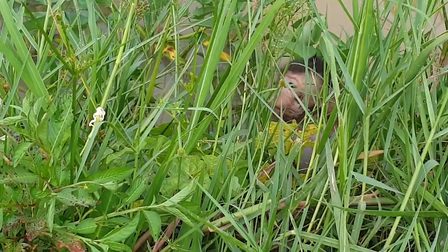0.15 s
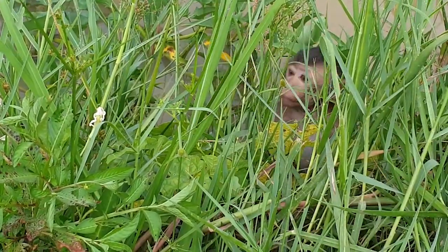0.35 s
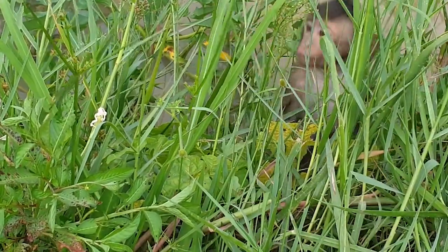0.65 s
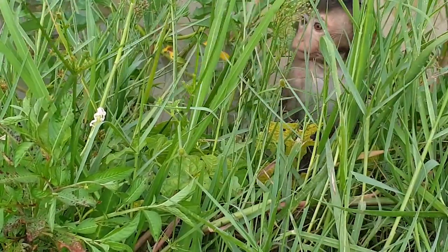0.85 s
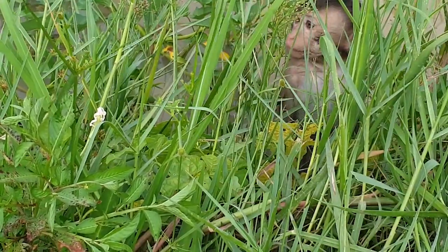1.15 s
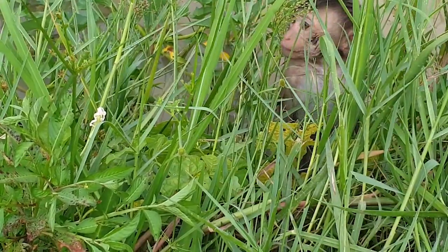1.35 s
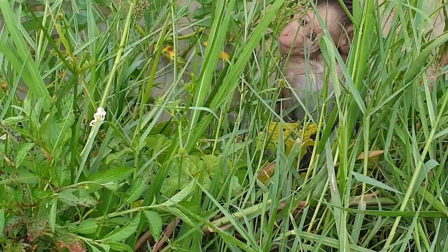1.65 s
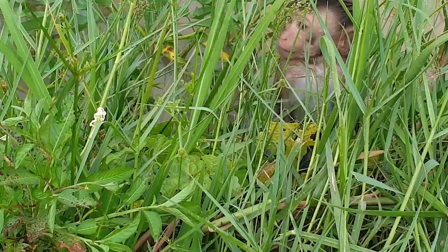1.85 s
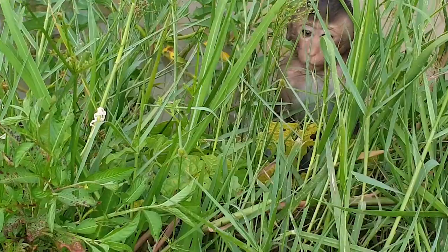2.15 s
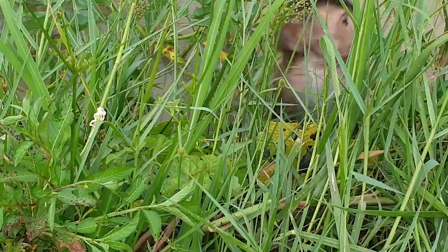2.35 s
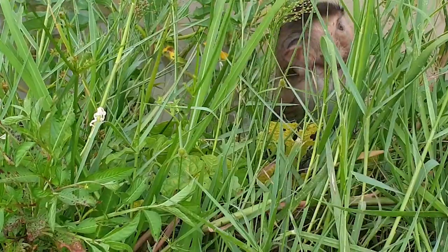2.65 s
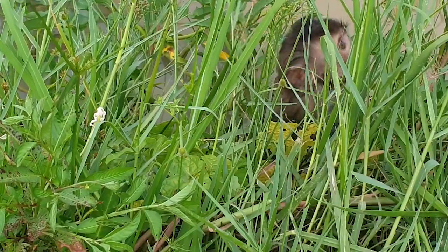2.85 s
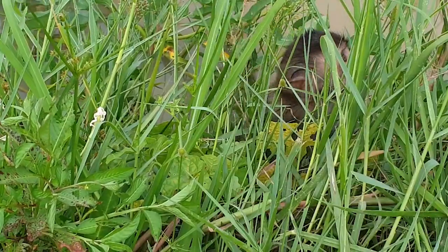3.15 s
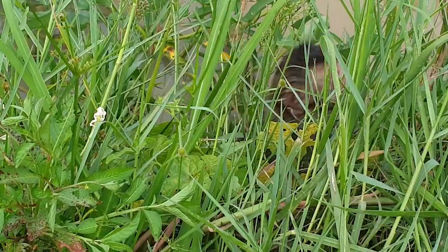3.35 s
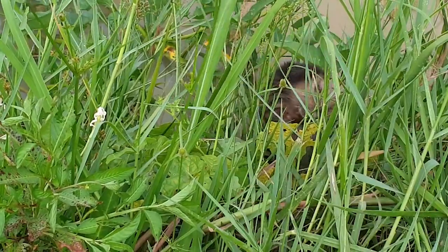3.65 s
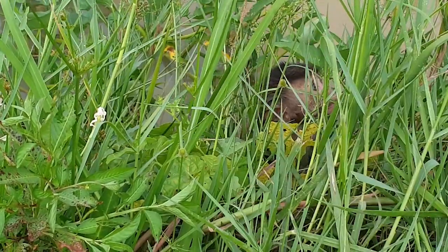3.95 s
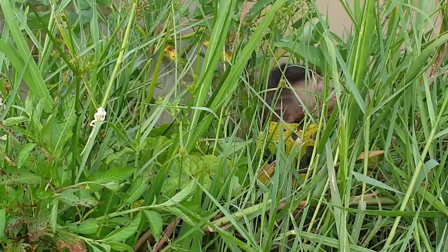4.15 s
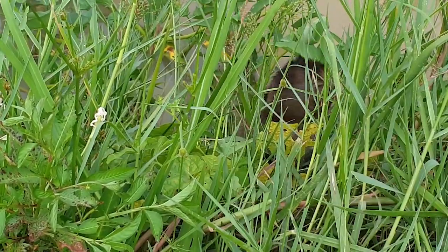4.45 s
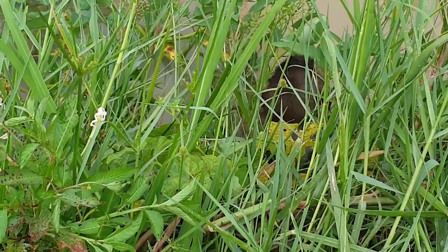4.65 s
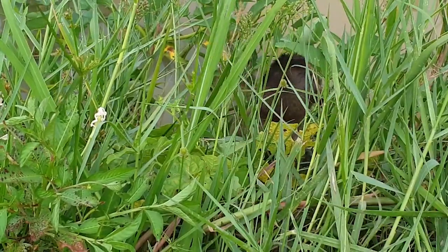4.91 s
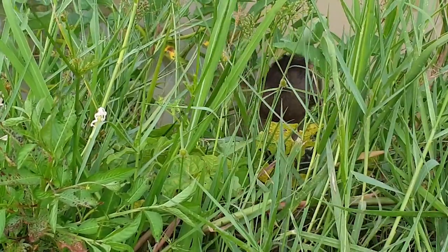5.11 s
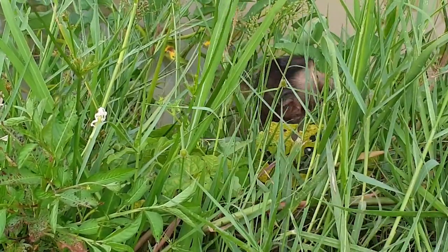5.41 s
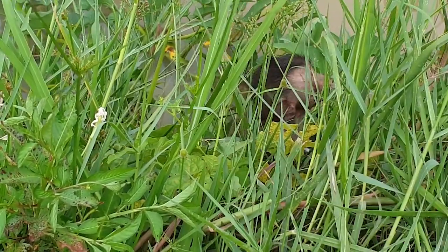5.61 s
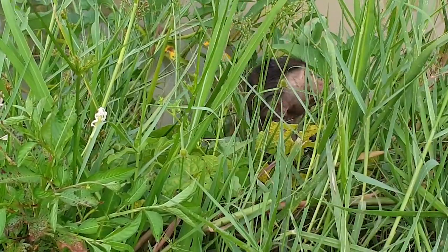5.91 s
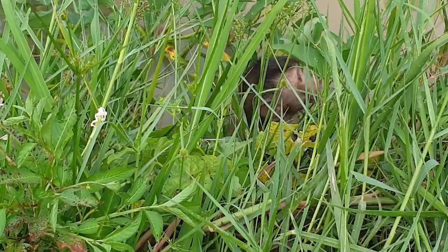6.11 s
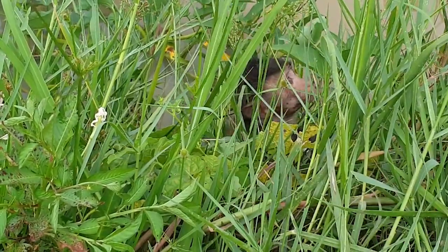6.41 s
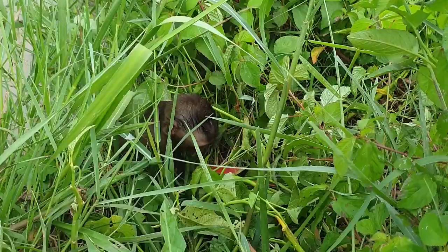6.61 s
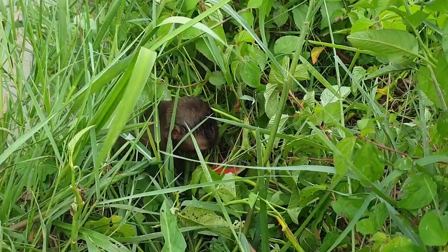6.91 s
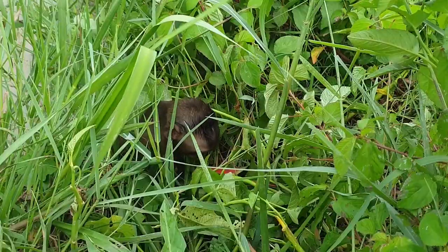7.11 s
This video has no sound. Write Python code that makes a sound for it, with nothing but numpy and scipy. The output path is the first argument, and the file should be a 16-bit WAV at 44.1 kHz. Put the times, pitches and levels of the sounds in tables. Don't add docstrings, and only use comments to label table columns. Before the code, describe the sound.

Birds whistle and twitter over rustling grass, a young monkey gives one high clear coo, then a low motor rumble abruptly takes over.

```python
import sys
import numpy as np
from scipy import signal
from scipy.fft import rfft, irfft, next_fast_len
from scipy.io import wavfile
from scipy.ndimage import map_coordinates

SR = 44100
rng = np.random.default_rng(int(sys.argv[2]) if len(sys.argv) > 2 else 0)


def generate_wav(sig):
    pcm = np.round(np.clip(np.atleast_2d(sig).T, -1, 1) * 32767).astype(np.int16)
    wavfile.write(sys.argv[1], SR, pcm)


def nominal_scale(level):
    x = np.asarray(level, float) / 20
    return 10 ** x


N = 320607
TIME, SIZE = np.arange(N) / SR, next_fast_len(N)
HZ = np.maximum(np.arange(SIZE // 2 + 1) * SR / SIZE, 1)
SCENE_CHANGE_S = 6.495

# pitch_hz, level_db (per Hz)
AIR_SPECTRUM = [(170, -14), (350, 9), (600, -3.5), (1500, -6), (2400, -5), (3400, -3), (4700, -6),
                (6800, -2.5), (7600, -5), (8600, -20), (10500, -7.5), (11500, -3.5), (12600, -14),
                (16000, -25)]
# start_s, level_db
TREE_BREEZE = [(0, -3), (.25, -5), (.4, -5), (.6, 2.5), (.8, -7), (1.12, -13), (1.25, -2), (1.4, -3),
               (1.6, -2), (2.75, -3), (3.3, -2), (4.4, 2), (5.1, 3), (5.6, 3), (5.85, -7), (6.2, 1.5),
               (6.35, -4), (6.5, 2)]
# start_s, peak_db, spread_s
GRASS_BRUSHES = [(0, -55, 0.023), (.22, -54, 0.17), (.74, -43.5, 0.072), (1.0, -48.5, 0.2),
                 (1.63, -48, 0.1), (2.0, -53.5, 0.046), (2.28, -48, 0.088), (2.51, -46, 0.14),
                 (2.96, -49, 0.13), (3.15, -55.5, 0.079), (3.4, -57, 0.17), (4.3, -75, .08),
                 (4.72, -60.5, 0.35), (5.34, -44, 0.083), (5.65, -55, 0.058), (5.92, -55, 0.075),
                 (6.19, -56, 0.019), (6.42, -80, 0.19), (2.2, -53.5, 0.56), (5.6, -55.5, 0.87)]
# pitch_hz, level_db (per Hz)
RUSTLE_SPECTRUM = [(530, -44), (900, -10.5), (1250, -8.5), (1470, -7.5), (1590, -10), (4100, -3),
                   (8760, -6.5), (12900, -2), (15200, -4.5), (16000, 0.5)]

# start_s, level_db
BREEZE = [(0, -50), (.5, -43), (1.0, -44.5), (1.62, -45), (2.0, -42), (2.25, -45.5), (2.62, -38.5),
          (2.75, -43.5), (2.95, -40.5), (3.25, -44), (3.4, -39), (4.25, -42.5), (4.42, -45.5), (4.5, -31.5),
          (4.62, -38.5), (5.65, -42), (5.9, -37.5), (6.4, -41)]
# pitch_hz, level_db (per Hz)
WIND_COVERED = [(18, -32), (35, -5), (60, 0.5), (100, -1), (160, -10.5), (270, -19), (450, -36.5),
                (700, -53.5)]
WIND_OPEN = [(18, -8), (40, -21), (90, -1), (140, -9.5), (220, -10), (450, -21.5), (900, -23.5)]
# start_s, peak_db, pitch_hz, length_s
WIND_BUFFETS = [(1.168, -36.5, 68, 0.032), (1.904, -30, 89, 0.024), (1.923, -36.5, 55, 0.044),
                (2.024, -43, 111, 0.036), (2.537, -33, 75, 0.045), (4.426, -36.5, 120, 0.0079),
                (4.442, -28.5, 108, 0.013), (4.453, -27.5, 137, 0.017), (4.502, -32.5, 66, 0.031),
                (4.527, -35, 199, 0.014), (4.534, -33, 72, 0.025), (4.549, -27, 87.5, 0.022),
                (4.697, -41, 72.7, 0.055), (0.131, -50, 59, 0.044), (0.296, -51, 70, 0.047),
                (1.564, -41.5, 75, 0.052), (2.096, -41.5, 59, 0.044), (2.624, -42, 128, 0.028),
                (3.341, -40, 67, 0.048), (3.712, -41, 65, 0.043), (3.821, -39, 81, 0.038),
                (3.955, -39, 70, 0.048), (4.049, -44, 75, 0.043), (5.34, -38.5, 67, 0.033),
                (5.901, -43, 62, 0.038), (5.986, -40, 69.4, 0.038), (6.169, -44, 57, .04)]
# start_s, peak_db, spread_s
OPEN_GUSTS = [(.62, -58, 0.12), (1.2, -62.5, 0.16), (1.62, -58, 0.066), (2.22, -60.5, 0.26),
              (2.68, -60.5, 0.24), (3.2, -66.5, 0.19), (3.56, -53.5, 0.065), (4.0, -56, 0.24),
              (4.62, -52, 0.094), (4.9, -52, 0.097), (5.35, -51, 0.4), (5.75, -62, 0.035),
              (6.22, -58, 0.13), (6.49, -53, 0.046)]
# pitch_hz, level_db
COVER_RESPONSE = [(100, 2), (600, -6.5), (1100, -11.5), (2200, -7), (3000, -13), (4500, -25), (7700, -37),
                  (9000, -25), (16000, -53)]
# pitch_hz, level_db (per Hz)
COVERED_HISS = [(400, -4), (800, 5), (1200, 7), (2200, -2.5), (3200, -5), (4500, -13), (6000, -21),
                (7700, -48), (9000, -22.5), (11000, -8.5), (14000, -12), (16000, -9)]

# start_s, level_db
MOTOR_LOAD = [
    (6.502, -28.5),
    (6.7, -31),
    (6.77, -28.5),
    (6.85, -30),
    (7.12, -27),
    (7.27, -30),
]
# pitch_hz, level_db (per Hz)
MOTOR_RUMBLE = [(12, -58.5), (20, -25), (54, -13), (76, -1), (146, -3), (202, -3.5), (272, -17.5),
                (298, -9.5), (327, -26), (496, -20.5), (557, -30.5), (884, -33.5), (1040, -42.5),
                (1730, -54), (5000, -52), (6500, -56), (11000, -120)]
# multiple of the firing rate, level_db
FIRING_ORDERS = [(2, -41), (3, -7), (4, -8.5), (5, -14.5), (6, -28), (7, -15.5), (8, -18), (10, -27)]
# start_s, pitch_hz, level_db, spread_s
LOOSE_PANELS = [(6.52, 86, -1, .025), (6.57, 122, -1, .03), (6.61, 90, -2, .025), (6.77, 86, 1.5, .05),
                (6.71, 172, -3, .035), (7.0, 146, -1.5, .025), (7.11, 150, 2.5, .04), (7.18, 195, 1, .025),
                (7.22, 100, 0, .035)]
# pitch_hz, level_db
MOTOR_UNSHARED = [(30, -2), (90, -32), (160, -17), (400, -9.5), (800, -8.5), (1500, 3.5), (3500, 0.5)]

# start_s, length_s, pitch_hz,
# width_hz, level_db
FAR_CHORUS = [(2.95, .85, 1960, 170, -73), (3.2, .36, 3950, 300, -67), (1.52, 2.6, 2920, 930, -66),
              (-2, 6.3, 790, 41, -78.5), (3.6, .5, 3100, 700, -63), (.68, .12, 3600, 2000, -60),
              (1.1, 0.08, 450, 130, -57), (1.18, .25, 450, 170, -62), (4.22, .22, 3580, 300, -64),
              (6.18, .06, 3200, 1800, -59), (0.85, 0.4, 3500, 800, -66), (-0.5, 0.79, 800, 210, -70),
              (.8, .42, 3950, 500, -66), (3.5, .56, 5850, 300, -74), (3.55, .5, 3850, 500, -67),
              (5.75, .08, 1050, 300, -62), (5.8, .28, 1150, 450, -67), (5.9, .11, 3250, 900, -63),
              (6.28, .2, 3250, 250, -69), (.1, .25, 1380, 200, -71), (.66, .4, 1430, 150, -71),
              (2.68, .22, 3950, 300, -66)]
# start_s, length_s, pitch_hz, level_db
DOVE_NOTES = [
    (.24, 0.13, 848, -60.5),
    (.44, 0.065, 850, -64),
    (.56, 0.12, 880.4, -54),
    (1.02, 0.057, 858, -62.5),
    (4.65, 0.074, 800, -65),
    (5.0, 0.14, 825, -58),
]
# start_s, length_s, pitch_hz, level_db
LOW_NOTES = [(2.08, 0.033, 1920, -69), (4.01, 0.05, 1900, -65), (3.83, .03, 1920, -71),
             (2.83, .035, 1900, -65), (4.28, .02, 1900, -69), (4.61, .028, 1920, -67),
             (6.18, .035, 1930, -67), (.97, 0.071, 1950, -70), (5.085, .03, 1920, -66)]
FAR_NOTES = [(.88, 0.015, 3190, -66), (1.1, .04, 3900, -67), (1.51, .02, 3720, -59),
             (2.07, 0.039, 3760, -59), (3.3, 0.075, 3850, -64), (3.41, .096, 3830, -69),
             (3.66, .06, 3930, -65), (3.9, .02, 4000, -66), (4.215, .015, 3550, -67),
             (4.245, 0.015, 3550, -62), (4.61, .03, 3800, -68), (4.71, .04, 3050, -65)]
HIGH_NOTES = [(3.3, 0.058, 5680, -58.5), (3.375, .05, 5620, -60), (3.472, 0.05, 5600, -57.5),
              (3.53, .05, 5700, -63), (3.63, 0.073, 5800, -73), (3.72, .04, 5800, -71),
              (3.885, 0.05, 5600, -70), (3.99, .045, 5620, -70), (3.57, .04, 5850, -69),
              (3.79, 0.056, 5650, -75)]
# start_s, length_s, end_hz, fall_hz, level_db
SLIDES = [(1.833, 0.013, 2780, 100, -56), (1.885, 0.0093, 3190, 50, -54), (1.919, .012, 3100, 150, -56),
          (1.935, .012, 3350, -100, -58), (2.29, 0.017, 3170, 380, -52), (3.65, .012, 3150, -50, -54),
          (3.675, .025, 3100, 100, -53), (3.708, .008, 2900, 200, -51), (3.727, 0.02, 2780, 150, -50),
          (3.925, .02, 3340, 300, -57), (4.205, 0.01, 3150, -50, -58), (4.01, .012, 3050, 100, -58),
          (4.058, .006, 2800, 200, -46), (4.078, .01, 2750, 150, -56), (1.225, .03, 2990, 350, -63),
          (4.29, .1, 2620, 100, -66), (2.728, .045, 3080, 250, -58), (1.1, .03, 3900, 600, -63),
          (3.77, .03, 2800, 200, -59), (4.04, .015, 3500, 100, -60), (3.04, .012, 3000, 100, -58),
          (3.19, .02, 3200, -50, -59)]
# start_s, level_db
SOFT_PEEPS = [(2.56, -55), (2.725, -54.5), (2.885, -59), (3.035, -57), (3.204, -57.5), (3.368, -48),
              (3.538, -47), (3.78, -61.5), (3.879, -52)]
SHARP_CHIPS = [(2.621, -49), (2.774, -46), (2.941, -44.5), (3.103, -42.5), (3.27, -43), (3.441, -44),
               (3.61, -48), (3.95, -46.5)]
# start_s, length_s, end_hz, fall_hz, level_db
NEAR_PHRASE = [(1.29, 0.022, 2383, 0, -57), (1.544, 0.098, 2490, 1300, -51.5),
               (1.644, 0.03, 2740, 602, -55), (1.705, 0.044, 2435, 150, -54),
               (1.735, 0.018, 2305, 100, -54.5), (1.777, 0.11, 2450, 1062, -50.5),
               (1.905, 0.047, 2500, 150, -59), (2.008, 0.11, 2440, 1395, -49.5),
               (2.145, 0.026, 2520, 172, -55.5), (2.18, 0.076, 2460, 60, -64), (2.29, 0.01, 2405, 200, -56),
               (2.46, 0.054, 2780, 150, -54), (5.12, 0.069, 3040, 132, -73)]

# start_s, length_s, pitch_hz, level_db, upper_boost_db
STALK_SQUEAKS = [
    (2.944, 0.025, 1747, -39, 2),
    (2.972, 0.023, 1738, -53.5, 12.5),
]
# multiple, level_db
SQUEAK_PARTIALS = [(1, -0.5), (2, -9), (3, -3.5), (4, -9.5), (5, -15), (6, -10), (7, -7), (8, -18)]
# start_s, peak_db, pitch_hz
DRY_SNAPS = [(0.158, -42.5, 5640), (0.336, -45, 14800), (0.6873, -33, 13200), (0.724, -26, 14800),
             (0.7544, -24, 13000), (1.2503, -29.5, 14100), (1.8097, -40, 6670), (1.956, -32.5, 12800),
             (2.135, -34.5, 15500), (2.18, -39, 14690), (2.7846, -41, 14400), (6.195, -47, 3300),
             (7.01, -43.5, 3500)]

# start_s, pitch_hz, first_partial_db, effort_db (second partial against the first)
COO_LINE = [
    (5.115, 1040, -47, -17),
    (5.14, 1005, -45, -26),
    (5.175, 1025, -41, -18),
    (5.228, 1082, -31.5, -13),
    (5.345, 1078, -27.5, -12),
    (5.41, 1087, -26, -7.5),
    (5.59, 1080, -27, -7.5),
    (5.70, 1054, -31, -12),
    (5.737, 1033, -40, -15),
]
# start_s, pitch_jump_hz, width_s
VOICE_BREAKS = [
    (5.2633, 134, 0.0018),
    (5.7357, 90, 0.0025),
]
# start_s, pitch_hz (shift), width_s
PITCH_PUSHES = [
    (5.398, 16, 0.03),
    (5.468, 6, .015),
    (5.55, -5, .02),
    (5.742, 50, .012),
]
# multiple, level_db (against it)
UPPER_PARTIALS = [(4, -22), (5, -14), (6, -6), (8, -22), (10, -22), (12, -22), (13, -21), (14, -26)]
# start_s, level_db
MOUTH_AIR = [
    (5.3, -52),
    (5.42, -52),
    (5.5, -46),
    (5.58, -44),
    (5.66, -49),
    (5.74, -58),
]
# pitch_hz, width_hz, level_db
MOUTH_RESONANCES = [(1404, 310, 0.5), (2380, 1400, -2.5), (6960, 2400, -0.5)]


def rms_one(x):
    return x / np.sqrt(np.mean(x ** 2) + 1e-20)


def in_time(rows, outside=None):
    s, *columns = np.transpose(rows)
    return [np.interp(TIME, s, column, outside, outside) for column in columns]


def at_hz(points):
    hz, db = np.transpose(points)
    return nominal_scale(np.interp(np.log(HZ), np.log(hz), db, -120, -120))


def coloured(x, gains):
    return irfft(rfft(x, SIZE) * gains, SIZE)[..., :N]


def bell(s, width):
    return np.exp(-((TIME - s) / width) ** 2)


def flicker(db, rate):
    knots = rng.standard_normal(400)
    place = TIME[::16] * rate * 2 % 390 + 3
    return nominal_scale(db * map_coordinates(knots, [place], order=3)).repeat(16)[:N]


def patchy_noise(spectrum, patchy_db, rate, grain_db=0):
    white = rng.standard_normal(N) * nominal_scale(grain_db * np.minimum(rng.exponential(1, N), 5))
    noise = rfft(rms_one(coloured(white, at_hz(spectrum))), SIZE)
    out, octaves = np.zeros(N), np.log2(HZ)
    lowest, highest = np.floor(np.log2(spectrum[0][0])), np.log2(spectrum[-1][0])
    for octave in np.arange(lowest, highest + 1):
        band = irfft(noise * np.clip(1 - abs(octaves - octave), 0, 1), SIZE)[:N]
        out += band * flicker(patchy_db, rate)
    return out * flicker(patchy_db, rate)


def swells(rows, rest_db):
    power = nominal_scale(rest_db) ** 2
    for s, db, spread in rows:
        power = power + (nominal_scale(db) * np.exp(-.5 * ((TIME - s) / spread) ** 2)) ** 2
    return np.sqrt(power) * (TIME < SCENE_CHANGE_S)


def resonance(x, hz, width_hz):
    r = np.exp(-np.pi * width_hz / SR)
    poles = [1, -2 * r * np.cos(2 * np.pi * hz / SR), r * r]
    return signal.lfilter([(1 - r * r) / 2, 0, (r * r - 1) / 2], poles, x)


def add(out, s, piece):
    i = round(s * SR)
    out[i:i + len(piece)] += piece[:N - i]


def echoes(x, db, t60):
    t = np.arange(SR // 4) / SR
    tail = rng.standard_normal(SR // 4) * nominal_scale(-60 * t / t60) * np.clip(t / 0.0077, 0, 1)
    return x + nominal_scale(db) * signal.fftconvolve(x, tail / np.sqrt(np.sum(tail ** 2)))[:N]


def still_air():
    air = nominal_scale(-58.5) * patchy_noise(AIR_SPECTRUM, patchy_db=1.5, rate=3.7)
    trees_top_hz = 2800
    dull = coloured(air, (HZ > 550) / (1 + (HZ / trees_top_hz) ** 4))
    return air + dull * (nominal_scale(in_time(TREE_BREEZE)[0]) - 1)


def port_hiss():
    return nominal_scale(-69) * rms_one(coloured(rng.standard_normal(N), at_hz(COVERED_HISS)))


def wind():
    eddies = (TIME < SCENE_CHANGE_S) * nominal_scale(in_time(BREEZE)[0])
    eddies = eddies * patchy_noise(WIND_COVERED, patchy_db=2.0, rate=11)
    buffets = np.zeros(N)
    puff_band = signal.butter(4, [120, 380], "band", fs=SR, output="sos")
    puffs = rms_one(signal.sosfilt(puff_band, rng.standard_normal(N)))
    for s, db, hz, length in WIND_BUFFETS:
        t = np.arange(int(length * SR)) / SR
        swing = np.sin(2 * np.pi * hz * t) + 0.055 * puffs[round(s * SR):][:len(t)]
        add(buffets, s, nominal_scale(db + 9.5) * swing * np.sin(np.pi * t / length) ** 2)
    gusts = nominal_scale(1.5) * swells(OPEN_GUSTS, rest_db=-75.5) * patchy_noise(WIND_OPEN, patchy_db=2.0, rate=6)
    return np.array([eddies + buffets, gusts + nominal_scale(-24) * resonance(eddies, 160, 120)])


def grass():
    return swells(GRASS_BRUSHES, rest_db=-73) * patchy_noise(RUSTLE_SPECTRUM, patchy_db=0.94, rate=25, grain_db=3.5)


def motor():
    firing_hz, cover_top_hz = 49.04, 4200
    body = patchy_noise(MOTOR_RUMBLE, patchy_db=1.1, rate=14)
    turn = 2 * np.pi * np.cumsum(flicker(.16, 4)) / SR
    tones = np.zeros(N)
    for k, db in FIRING_ORDERS:
        hz = k * firing_hz
        tones += nominal_scale(db - 5.5) * flicker(3.9, 7) * np.sin(hz * turn + hz)
    for s, hz, db, spread in LOOSE_PANELS:
        tones += nominal_scale(db) * np.exp(-.5 * ((TIME - s) / spread) ** 2) * np.sin(hz * turn)
    apart = coloured(np.roll(body, SR), at_hz(MOTOR_UNSHARED))
    left = (0.83 * body + tones + apart) * nominal_scale(-1.5)
    right = (0.83 * body + tones - apart) * nominal_scale(1.2)
    left = coloured(left, 1 / (1 + (HZ / cover_top_hz) ** 4))
    fade = np.clip((TIME - SCENE_CHANGE_S - .007) / .006, 0, 1)
    fade = fade * np.clip((TIME[-1] - TIME) / .001 + .4, 0, 1)
    return fade * nominal_scale(in_time(MOTOR_LOAD)[0]) * np.array([left, right])


def whistles(notes, bend, arch_hz=0, onset=0.66):
    out = np.zeros(N)
    for s, length, hz, *fall, db in notes:
        u = np.linspace(0, 1, int((length + 0.0094) * SR))
        fall_left = (np.exp(-u / bend) - np.exp(-1 / bend)) / (1 - np.exp(-1 / bend))
        pitch = hz + sum(fall) * fall_left + arch_hz * np.sin(np.pi * u ** 0.75)
        phase = 2 * np.pi * np.cumsum(pitch) / SR
        tone = np.sin(phase) + nominal_scale(-41) * np.sin(2 * phase)
        add(out, s - .004, nominal_scale(db + 3.0) * np.sin(np.pi * u ** onset) ** .5 * tone)
    return out


def chorus():
    out = np.zeros(N)
    for start, length, hz, width, db in FAR_CHORUS:
        band = rms_one(resonance(resonance(rng.standard_normal(N), hz, width), hz, width))
        edges = np.clip(np.minimum(TIME - start, start + length - TIME) / 0.0092, 0, 1)
        out += nominal_scale(db) * flicker(5.4, 9) ** min(length, 1) * band * edges
    return out


def far_birds():
    far = whistles(FAR_NOTES, bend=1, arch_hz=88) + whistles(LOW_NOTES, bend=1, arch_hz=24.8)
    dove = whistles(DOVE_NOTES, bend=1, arch_hz=75.0, onset=1.0)
    return echoes(far * flicker(4.5, 45), db=-4, t60=0.2) + echoes(dove * flicker(1.0, 16), db=-3, t60=0.61)


def near_birds():
    # start_s, length_s, end_hz, fall_hz, level_db
    peeps = [(s, 0.0296, 2710, 270, db) for s, db in SOFT_PEEPS]
    chips = [(s + .004, 0.0232, 2685, 337, db) for s, db in SHARP_CHIPS]
    rough = whistles(SLIDES, bend=0.89)
    rough += whistles(peeps, bend=0.54, onset=1.4) + whistles(chips, bend=0.43, onset=0.48)
    rough += whistles(HIGH_NOTES, bend=1, arch_hz=300, onset=0.59)
    waver = flicker(2.1, 55)
    phrase = whistles(NEAR_PHRASE, bend=0.14, onset=0.61)
    return echoes(phrase * waver ** 0.79 + rough * waver, db=-9.0, t60=0.4)


def stalks():
    out = np.zeros(N)
    for s, length, hz, db, upper_db in STALK_SQUEAKS:
        t = np.arange(int(length * SR)) / SR
        tone = np.zeros(len(t))
        for k, level_db in SQUEAK_PARTIALS:
            tone += nominal_scale(level_db + upper_db * (k > 1)) * np.sin(2 * np.pi * k * hz * t + k * k)
        add(out, s, nominal_scale(db) * tone * np.sin(np.pi * (t / length) ** 0.5))
    for s, db, hz in DRY_SNAPS:
        burst = rng.standard_normal(300) * np.exp(-np.arange(300) / 22)
        crack = resonance(burst, min(hz, 15000), 0.21 * hz)
        add(out, s, nominal_scale(db + 5.5) * crack / abs(crack).max())
    return out


def monkey():
    pitch, first_db, effort_db = in_time(COO_LINE)
    opened = TIME - VOICE_BREAKS[0][0]
    first_db = first_db + 1.5 * np.clip(opened / 0.003, 0, 1)
    shut_db = -17.5 - 350 * np.clip(opened + .1, 0, 1)
    open_db = -24.5 + 17.5 * np.clip(opened, 0, 1)
    third_db = first_db + np.where(opened > 0, open_db, shut_db)
    catch_db = 4
    third_db = third_db - catch_db * bell(5.303, .006)
    effort_db = effort_db - catch_db * np.exp(-((opened + 0.0074) / 0.0042) ** 2)
    second_db = first_db + effort_db
    seventh_db = first_db - 20.5 + 0.42 * effort_db + 2 * np.clip(opened - .3, -.5, .5)

    pitch = pitch + 20 * (opened > 0) + sum(hz * bell(s, width) for s, hz, width in PITCH_PUSHES)
    breaks = sum(jump * bell(s, width) for s, jump, width in VOICE_BREAKS)
    first_db = first_db + 0.016 * breaks
    phase = 2 * np.pi * np.cumsum(pitch * flicker(0.013, 25)) / SR
    skip = 2 * np.pi * np.cumsum(breaks) / SR
    settled = skip[round(COO_LINE[5][0] * SR)] - .4
    voice = nominal_scale(first_db) * np.cos(phase + skip)
    voice += nominal_scale(second_db) * np.cos(2 * phase + skip + settled)
    voice += nominal_scale(third_db) * np.cos(3 * phase + .7 * np.clip(skip - settled - .4, 0, None))
    upper = np.cos(7 * phase) + sum(nominal_scale(db) * np.sin(k * phase) for k, db in UPPER_PARTIALS)
    voice += nominal_scale(seventh_db + 6.0) * flicker(2.5, 17) * upper
    gate = np.clip((TIME - COO_LINE[0][0]) / 0.01, 0, 1) * np.clip(1 - (TIME - COO_LINE[-1][0]) / 0.005, 0, 1)

    white, air = rng.standard_normal(N), np.zeros(N)
    for hz, width, db in MOUTH_RESONANCES:
        air += nominal_scale(db) * resonance(resonance(white, hz, width), hz, width) / np.sqrt(width)
    breath = nominal_scale(in_time(MOUTH_AIR, -120)[0]) * rms_one(air)
    return echoes(nominal_scale(3.0) * gate * voice + breath, db=-29, t60=.45)


def scene():
    leaves = still_air() + grass()
    far = chorus() + far_birds() + near_birds()
    near = stalks() + monkey()
    late_far = nominal_scale(-3.5) * np.roll(far, 17)
    late_leaves = nominal_scale(-3.5) * resonance(np.roll(leaves, 900), 3600, 4500)
    covered = coloured(np.roll(near, -3) + late_far + late_leaves, at_hz(COVER_RESPONSE))
    return np.array([covered + port_hiss(), near + far + leaves]) + wind() + motor()


def top_cut(x):
    return signal.sosfilt(signal.butter(12, 15850, fs=SR, output="sos"), x)


def record(dry):
    mix = coloured(dry, HZ < 15840)
    return top_cut(mix)


dry = scene()
out = record(dry)
generate_wav(out)
```